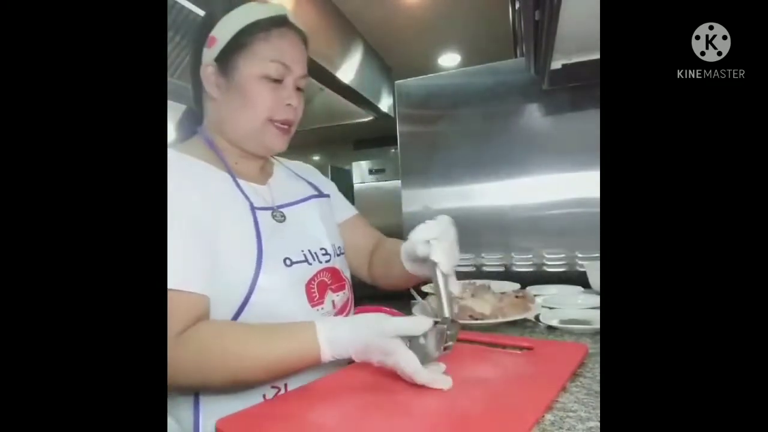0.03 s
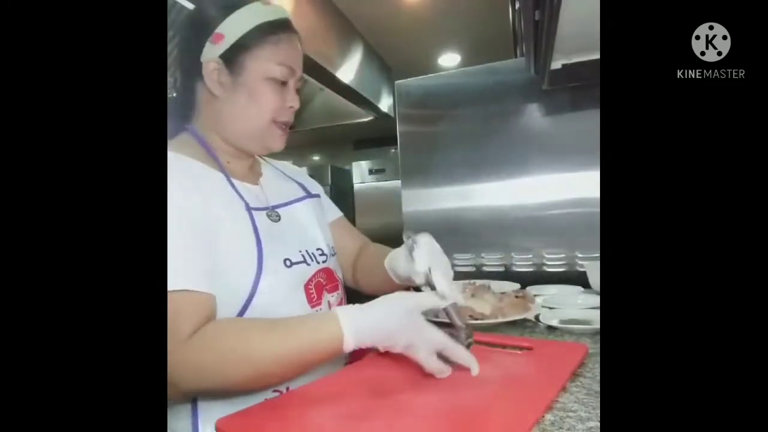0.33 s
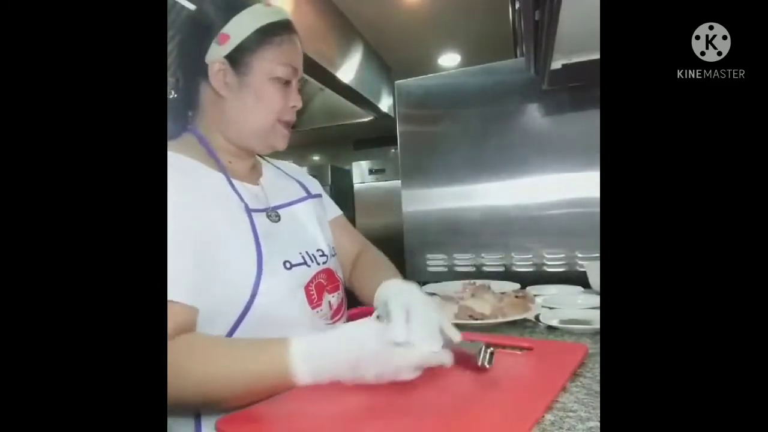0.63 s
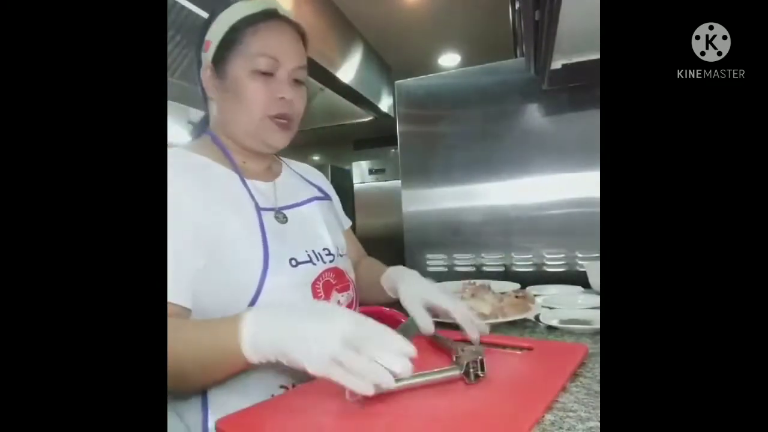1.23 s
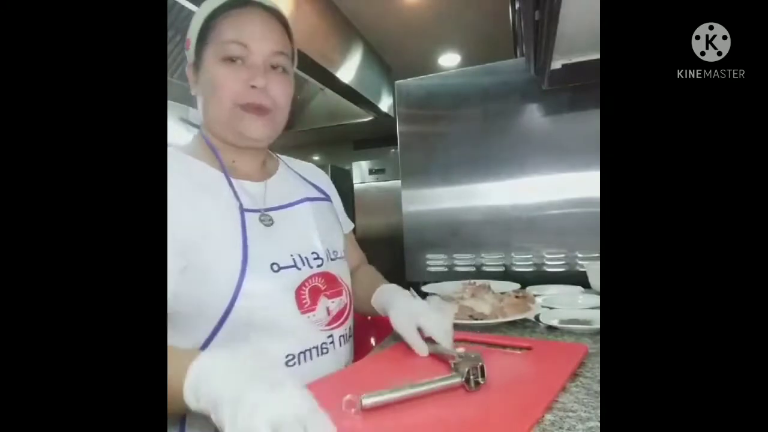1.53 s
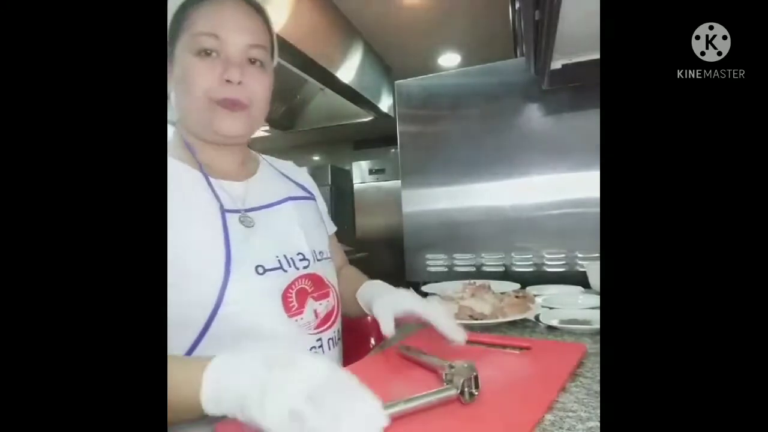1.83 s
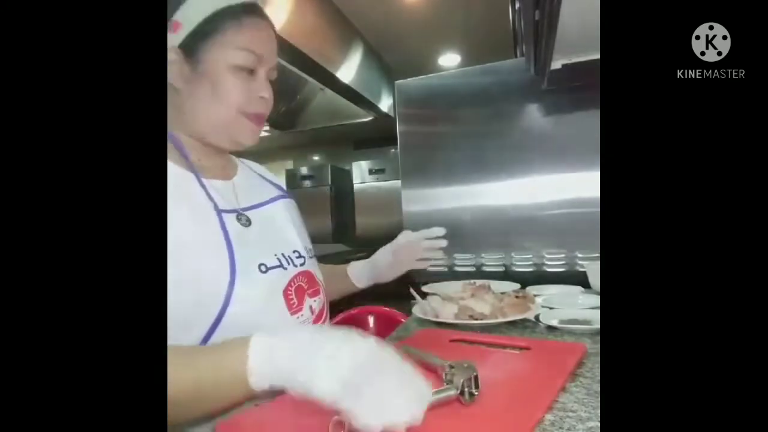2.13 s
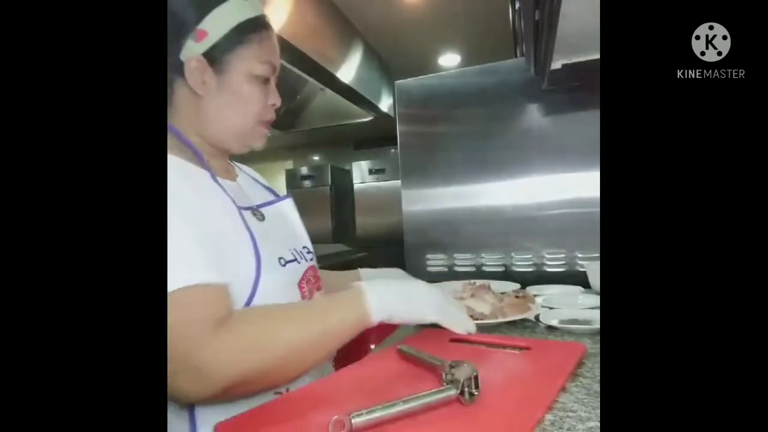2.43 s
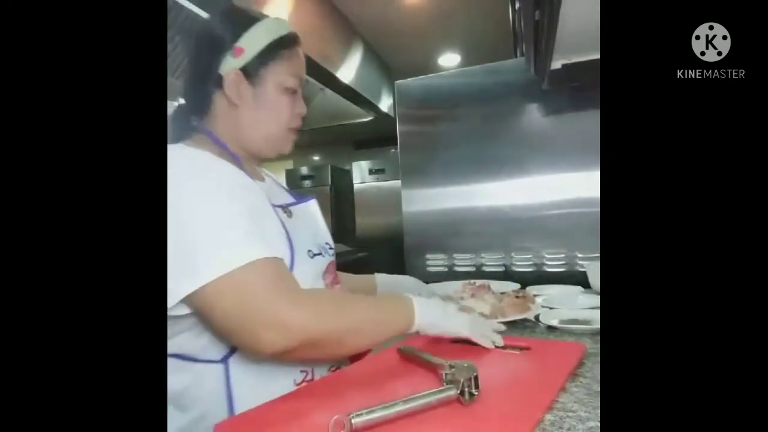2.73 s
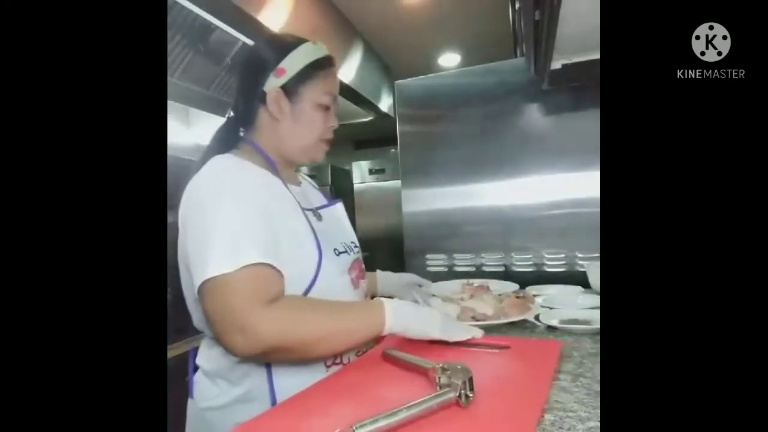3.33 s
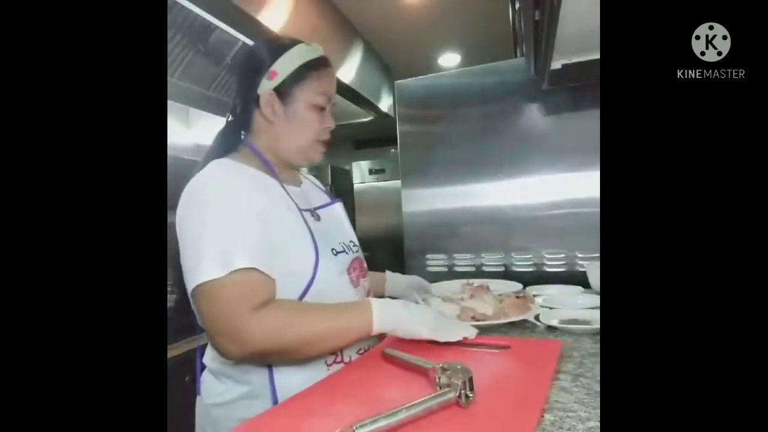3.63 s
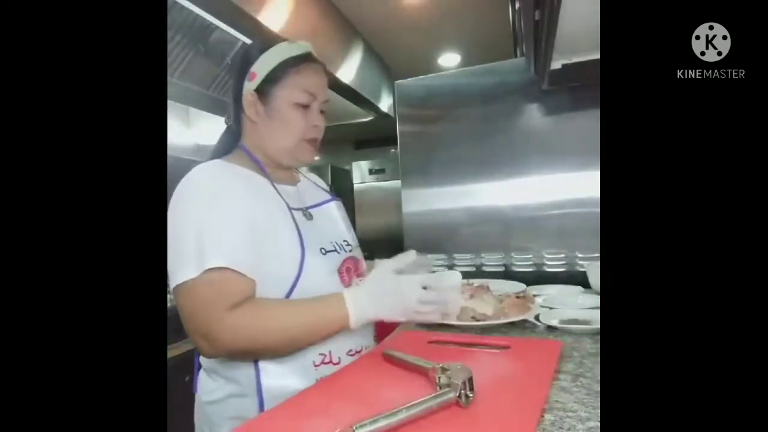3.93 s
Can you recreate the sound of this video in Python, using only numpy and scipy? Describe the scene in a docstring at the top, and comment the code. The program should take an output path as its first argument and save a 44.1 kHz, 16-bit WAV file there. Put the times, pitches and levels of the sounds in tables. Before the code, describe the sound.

A metal tool knocks on a cutting board, then dishes clatter and ring in a kitchen.

```python
"""A hard-walled kitchen, one microphone near the counter; ventilation hums and the room answers every blow.
Gloves rub, then a steel hand tool knocks on a plastic cutting board and is dragged, its hinge ticking.
Just past one second it drops flat with a sharp clack, then shifts and ticks a little more.
Gloves and a plate rub softly as the hands move. At 3.3 s crockery clatters down and rings;
half a second later a plate touches down with one more clink."""
import numpy as np
import sys
import numpy as np
from scipy import signal
from scipy.fft import rfft, irfft
from scipy.io import wavfile
from scipy.ndimage import uniform_filter1d, minimum_filter1d, map_coordinates

SR = 44100
rng = np.random.default_rng(int(sys.argv[2]) if len(sys.argv) > 2 else 0)


def file_out(sig):
    """Save sig as 16-bit WAV at sys.argv[1]."""
    # one column per channel
    cols = np.atleast_2d(sig).T
    # limit, then scale
    lim = np.clip(cols, -1, 1)
    pcm = np.round(lim * 32767).astype(np.int16)
    wavfile.write(sys.argv[1], SR, pcm)


N = 4 * SR
COUNTER_HZ = 89.9  # resonance of the counter under the board


def amp(db):
    """Decibels to gain."""
    return 10 ** (np.asarray(db) / 20)


def unit(x):
    """Scale to rms 1."""
    return x / np.sqrt(np.mean(x ** 2) + 1e-20)


def along(points, hz):
    """Interpolate (f/Hz, value) points on a log frequency axis."""
    f, v = np.transpose(points)
    return np.interp(np.log(hz + 1), np.log(f + 1), v)


def bell(hz, centre_hz, octaves):
    """A resonance that falls to half at the given octaves either side of its centre."""
    return 1 / (1 + (np.log2((hz + 1) / centre_hz) / octaves) ** 2)


def second():
    """Time and frequency axes of a one-second sound."""
    return np.arange(SR) / SR, np.fft.rfftfreq(SR, 1 / SR)


def fade(t, t60):
    """Exponential decay, 60 dB down after t60 seconds."""
    return np.exp(-np.log(1000) * t / t60)


def wobble(rate, size):
    """A smooth random curve, rate knots a second."""
    at = np.arange(size) * rate / SR
    return map_coordinates(rng.standard_normal(4096), [at], mode="wrap")


def colour(x, gain):
    """Minimum-phase filter with the given gain per frequency."""
    cepstrum = irfft(np.log(np.maximum(gain, 1e-6)))
    half = len(cepstrum) // 2
    causal = np.r_[cepstrum[0], 2 * cepstrum[1:half]]
    impulse = irfft(np.exp(rfft(causal, len(cepstrum))))[:half]
    return signal.fftconvolve(x, impulse)[:len(x)]


def shelves(hz, body_db, treble_db, body_hz=700, treble_hz=3320):
    """Gain of a contact with more or less body and treble."""
    return amp(body_db / (1 + (hz / body_hz) ** 2) + treble_db * hz ** 2 / (hz ** 2 + treble_hz ** 2))


def ring(modes, scatter_db=0.5, detune=0.004):
    """Decaying modes with wandering phase, a little different at each blow."""
    out, (t, _) = np.zeros(SR), second()
    for hz, db, t60 in modes:
        envelope = amp(db + scatter_db * rng.normal()) * fade(t, t60)
        cycles = hz * (1 + detune * rng.normal()) * t + rng.random()
        out += envelope * np.sin(2 * np.pi * cycles + wobble(67.2, SR))
    return out


def add(track, s, x):
    """Mix x into the track at time s."""
    start = round(s * SR)
    x = x[max(0, -start):]
    part = track[max(0, start):][:len(x)]
    part += x[:len(part)]


def kitchen(x, wet_db, build_s=0.0027):
    """The direct sound at the microphone plus the diffuse answer of the hard walls."""
    # reverberation time: f/Hz, t60/s
    decay_times = [(100, .4), (400, 0.47), (1200, 0.64), (4000, 0.66), (8000, 0.56), (13000, 0.55)]
    hz, t, noise = signal.stft(rng.standard_normal(SR), SR, nperseg=256)
    envelope = fade(t, along(decay_times, hz)[:, None]) * (1 - np.exp(-t / build_s))
    tail = signal.istft(noise * envelope, SR)[1]
    return x + amp(wet_db) * signal.fftconvolve(x, tail / np.linalg.norm(tail))[:len(x)]


def ventilation(air_db=-55.5, air_sway_db=0.6, hum_sway_db=2.5):
    """Room tone: soft air noise with wavering fan tones."""
    # spectrum of the moving air: f/Hz, level/dB
    air_spectrum = [(15, -81.5), (25, -42.5), (64, -25), (79, -15), (100, -12), (164, -29), (203, -14.5),
                    (400, -19), (433, -25), (520, -18), (609, -33.5), (658, -22.5), (975, -41.5),
                    (3330, -37), (13000, -52.5)]
    # fan tones: f/Hz, level/dB
    fan_tones = [(98, -56), (200, -62), (242, -62)]
    t, hz = np.arange(N) / SR, np.fft.rfftfreq(N, 1 / SR)
    air = unit(irfft(rfft(rng.standard_normal(N)) * amp(along(air_spectrum, hz)), N))
    hum = np.zeros(N)
    for tone_hz, db in fan_tones:
        peak = np.sqrt(2) * amp(db + hum_sway_db * wobble(24, N))
        hum += peak * np.sin(2 * np.pi * tone_hz * t + 0.7 * wobble(2.3, N))
    return amp(air_db + air_sway_db * wobble(3.2, N)) * air + hum


def rubs(grain_db=1.5):
    """Gloves and a plate rub as the hands move: grainy friction that swells and fades."""
    # hand strokes: t/s, length/s, level/dB, centre f/Hz, half-width/octaves
    strokes = [(-.06, 0.2, -54, 3150, 1), (1.932, 0.11, -69, 6000, 0.87), (2.583, 0.07, -61.5, 3000, 0.46),
               (2.659, 0.15, -58, 3220, 0.56), (2.839, 0.18, -51.5, 760, 0.81),
               (3.098, 0.059, -61.5, 2780, 1), (3.268, 0.065, -53.5, 2780, 0.93)]
    out, (t, hz) = np.zeros(N), second()
    for s, length, db, centre_hz, octaves in strokes:
        swell = np.sqrt(np.abs(np.sin(np.pi * np.clip(t / length, 0, 1))))
        grains = unit(rng.standard_normal(SR) * amp(grain_db * wobble(250, SR)))
        friction = colour(grains * swell, unit(bell(hz, centre_hz, octaves)))
        add(out, s, amp(db) * kitchen(friction, wet_db=0.5))
    return out


def slides(rise_s=0.032, fall_s=0.081, slip_db=1):
    """Steel and gloves slip unevenly on the board, exciting tool and board; the counter rumbles."""
    # drags: t/s, length/s, level/dB, board body/dB, treble/dB, counter rumble/dB
    drags = [(0.332, 0.087, -59, 27, 11, -65), (0.468, 0.19, -38, 0, -12.5, -48),
             (0.612, 0.1, -42, -4, -5, -41), (.84, 0.17, -52, 3, 5.5, -45.5),
             (1.487, 0.18, -50, 9, -2, -52), (1.673, 0.14, -55.5, 5, 4, -52)]
    # spectrum of the scrape: f/Hz, level/dB
    scrape_spectrum = [(100, -11), (250, 0.5), (400, 2.5), (750, -11), (1100, -2.5), (1550, -6.5),
                       (2200, -6), (3000, -6.5), (7000, -12), (12500, -23)]
    # resonances of the dragged tool: f/Hz, boost/dB
    resonances = [(1050, 2.5), (1410, 6.5), (1620, 7.5), (2200, 6)]
    out, (t, hz) = np.zeros(N), second()
    peaks_db = sum(db * bell(hz, mode_hz, octaves=0.087) for mode_hz, db in resonances)
    body = unit(amp(along(scrape_spectrum, hz) + peaks_db))
    for s, length, db, body_db, treble_db, rumble_db in drags:
        stroke = np.clip(t / rise_s, 0, 1) * np.clip((length - t) / fall_s + 0.5, 0, 1)
        slips = unit(rng.standard_normal(SR) * amp(slip_db * wobble(380, SR)))
        scrape = colour(slips * stroke, body * shelves(hz, body_db, treble_db))
        rumble = stroke * np.sin(2 * np.pi * COUNTER_HZ * t + wobble(11, SR))
        add(out, s, amp(db) * kitchen(scrape, wet_db=-5.5) + amp(rumble_db) * rumble)
    return out


def hinge_ticks(ping_db=-5):
    """Small bright clicks of loose steel parts, each with a brief ring."""
    # hinge and handle ticks: t/s, level/dB, centre f/Hz, t60/s
    ticks = [(.695, -44.5, 7000, 0.046), (.852, -39, 6000, 0.037), (.886, -30, 4600, 0.036),
             (1.105, -52.5, 7000, 0.098), (1.53, -43.5, 7000, 0.081), (1.696, -34, 8000, 0.023),
             (1.7603, -38.5, 7000, .02), (1.795, -46, 5000, 0.036)]
    # modes of the hinge: f/Hz, level/dB, t60/s
    hinge_modes = [(1210, -11, .3), (3814, -3.5, 0.061), (4670, -1, 0.071), (7640, -1.5, .06),
                   (8000, -11.5, 0.045)]
    out, (t, hz) = np.zeros(N), second()
    for s, db, centre_hz, t60 in ticks:
        band = bell(hz, centre_hz, octaves=0.38)
        click = colour(rng.standard_normal(SR) * fade(t, t60), unit(band))
        ping = amp(ping_db) * colour(ring(hinge_modes), np.sqrt(band))
        add(out, s, amp(db) * kitchen(click + ping, wet_db=-8))
    return out


def crockery(contacts, modes, china_db=-7.5, rise_s=0.00069):
    """Quick contacts of dishes: a thunk and a dense short clatter under long ringing modes."""
    # spectrum of the clatter: f/Hz, level/dB
    clatter_spectrum = [(30, -28), (60, -31), (95, -4), (160, -5.5), (250, -27), (400, 0), (580, -8.5),
                        (850, -3), (1300, -3), (2200, -1), (2750, -9.5), (3400, -2.5), (4800, -9),
                        (5800, -11.5), (6500, -28.5), (7500, -16.5), (9000, -39), (12500, -48)]
    # modes of a dish's foot meeting the counter: f/Hz, level/dB, t60/s
    foot_modes = [(94, -26, 0.28), (556.7, -8, 0.12), (800, -11, 0.027), (857, -4.5, 0.069)]
    out, (t, hz) = np.zeros(N), second()
    clatter_gain = unit(amp(along(clatter_spectrum, hz)))
    rise = 1 - np.exp(-t / rise_s)
    for s, db, body_db, treble_db, ring_db, thunk_db in contacts:
        clatter = colour(rng.standard_normal(SR) * fade(t, t60=0.12), clatter_gain)
        ringing = amp(china_db + ring_db) * ring(modes) * rise
        dish = colour(clatter + ringing, shelves(hz, body_db, treble_db))
        thunk = amp(thunk_db) * ring(foot_modes) * rise
        add(out, s, amp(db) * kitchen(dish + thunk, wet_db=-2.5))
    return out


def plate_clink():
    """One plate touches down twice, so quickly that it is heard as a single clink."""
    # contacts: t/s, level/dB, body/dB, treble/dB, ring/dB, foot thunk/dB
    taps = [(3.813, -27, 2.5, -4, -1, 3.5), (3.821, -19.5, -6, -7, -2.5, -3.5)]
    # modes of the plate: f/Hz, level/dB, t60/s
    plate_modes = [(264.4, -1.5, 0.17), (553, -10, .15), (847, -7, .15), (1360, 4.5, 0.14), (1580, -16, .3),
                   (2070, -2.5, .3), (2580, -12.5, .5), (3190, 2.5, 0.23), (3343, 7, 0.14),
                   (4200, -0.5, 0.27), (4240, -10, 0.51), (4950, -0.5, 0.27), (5440, -9, .12),
                   (5950, -17, 0.33), (6600, -20.5, 0.69), (7600, -20, 0.39), (8040, -27, 0.26),
                   (10400, -22, 0.23), (11300, -23, .15)]
    return crockery(taps, plate_modes)


def dish_clatter():
    """Dishes come down on the counter, strike one another and ring on."""
    # contacts: t/s, level/dB, body/dB, treble/dB, ring/dB, foot thunk/dB
    clinks = [(3.3226, -18.5, 3, 0, -3, 11.5), (3.327, -17, -4, 8, 3.5, -11), (3.346, -16, 4, 6, 3, -17),
              (3.364, -10.5, -1.5, 2.5, -6.5, -15), (3.384, -13.5, -5.5, -8, 3.5, -17)]
    # modes of the dishes: f/Hz, level/dB, t60/s
    dish_modes = [(266, -0.5, 0.071), (589, -3, 0.13), (827, -23, 0.36), (1318, -2.5, 0.33),
                  (1696, -4, 0.29), (2040, -6.5, 0.4), (2131, -1, 0.4), (2196, -0.5, 0.14),
                  (2376, -6.5, 0.4), (3070, -3, 0.23), (3380, 4.5, 0.11), (3374, -5, 0.15),
                  (3550, -7.5, 0.22), (4060, -13, 0.61), (4150, -6.5, 0.41), (4610, 3, 0.11),
                  (4723, -8, .45), (5900, -13, 0.65), (7200, -21.5, .35), (7600, -16.5, 0.4),
                  (7710, -27.5, 0.34), (8580, -17.5, 0.17), (9610, -28, 0.25), (10090, -15, 0.1),
                  (9970, -29, 0.33), (11860, -27, 0.2), (11950, -27, 0.2), (12300, -19.5, 0.12)]
    return crockery(clinks, dish_modes)


def tool_knocks(steel_db=-2, board_db=-16.5, thump_rise_s=0.004):
    """Each blow of the tool snaps, rattles the board, rings the steel and thumps the counter."""
    # blows: t/s, level/dB, board body/dB, mid/dB, treble/dB, steel ring/dB, counter thump/dB, snap/dB
    blows = [(.1598, -24.5, 1, -8, 0, -12, -31.5, 12), (.163, -29.5, 6, -1, 3, -9, -60, 18),
             (.411, -34, 8, 2.5, -3, -7, -36, 16.5), (0.415, -27, -1, -4.5, 15, -10.5, -42, 14.5),
             (0.435, -33, 2.5, 3.5, 7, -15.5, -26.5, 6), (.449, -32, 6, 2, 2.5, -15, -31, 12),
             (1.1687, -11.5, -9, 2, -4, -12, -27.5, 22), (1.174, -19, 4.5, 9, 0.5, 0.5, -48, 18),
             (1.563, -37, 1, -4, -23, -5.5, -41, 23)]
    # spectrum of steel striking plastic: f/Hz, level/dB
    clack_spectrum = [(30, -39.5), (70, -12), (150, -21), (260, 0), (550, 0), (750, -3.5), (1220, -2),
                      (2200, -5), (3100, -10), (4400, -6), (6200, -8.5), (7900, -6.5), (9200, -13),
                      (12500, -17.5)]
    # modes of the steel tool: f/Hz, level/dB, t60/s
    steel_modes = [(1157, -4, 0.49), (1203, 2.5, 0.15), (1260, -1, 0.18), (1455, -9.5, 0.16),
                   (1685, -5, .25), (2253, -11, 0.34), (2336, -11, .25), (3430, -17, .25),
                   (4000, -11.5, .1), (5432, -21, 0.23)]
    # modes of the cutting board: f/Hz, level/dB, t60/s
    board_modes = [(240.3, -2, 0.17), (351, -2, .16), (443.6, -1, .15), (569, -4.5, .18), (1081, -3, 0.45)]
    out, (t, hz) = np.zeros(N), second()
    clack_gain = unit(amp(along(clack_spectrum, hz)))
    mid_band = bell(hz, centre_hz=2470, octaves=0.88)
    thump = np.sin(2 * np.pi * COUNTER_HZ * t) * fade(t, t60=0.26) * (1 - np.exp(-t / thump_rise_s))
    for s, db, body_db, mid_db, treble_db, ring_db, thump_db, snap_db in blows:
        contact = rng.standard_normal(SR) * fade(t, t60=0.08)
        contact[0] = amp(snap_db)  # the snap: one impulse at first touch
        clack = colour(contact, clack_gain * shelves(hz, body_db, treble_db) * amp(mid_db * mid_band))
        steel = amp(steel_db + ring_db) * ring(steel_modes)
        board = amp(board_db + body_db) * ring(board_modes)
        add(out, s, amp(db) * kitchen(clack + steel + board, wet_db=-5.5) + amp(thump_db) * thump)
    return out


def scene():
    """All sources at one microphone."""
    dishes = dish_clatter() + plate_clink()
    return (tool_knocks() + hinge_ticks() + slides() + rubs() + dishes + ventilation())[None]


def record(dry, ceiling=0.9, top_hz=12950, window_samples=45):
    """A fast limiter holds the loudest peaks; a steep low-pass ends the microphone's band."""
    lowpass = signal.ellip(10, 0.2, 70, top_hz, fs=SR, output="sos")
    needed_gain = ceiling / np.maximum(np.abs(signal.sosfilt(lowpass, dry)), ceiling)
    held_gain = minimum_filter1d(needed_gain, 2 * window_samples)
    smooth_gain = uniform_filter1d(held_gain, window_samples)
    return signal.sosfilt(lowpass, dry * smooth_gain)


dry = scene()
out = record(dry)
file_out(out)
```